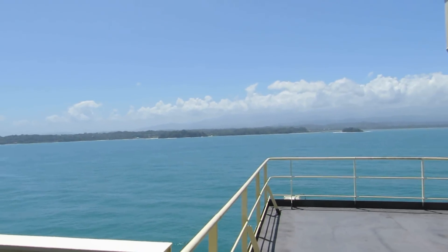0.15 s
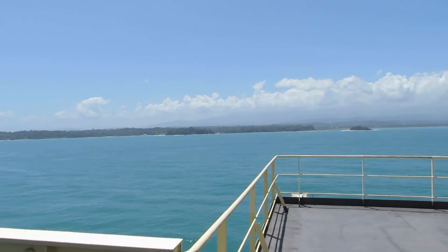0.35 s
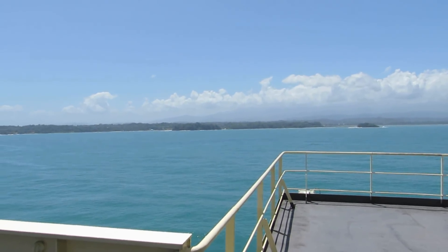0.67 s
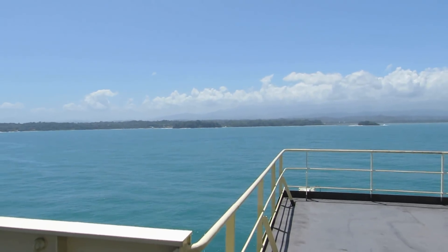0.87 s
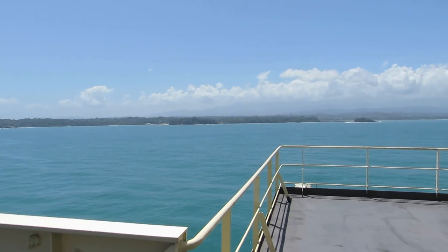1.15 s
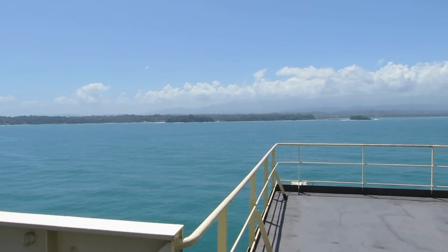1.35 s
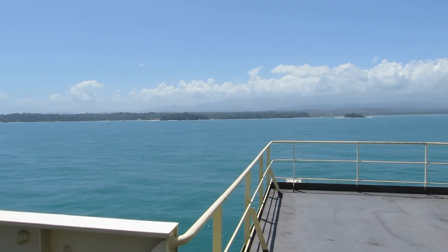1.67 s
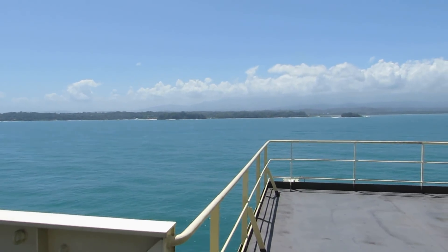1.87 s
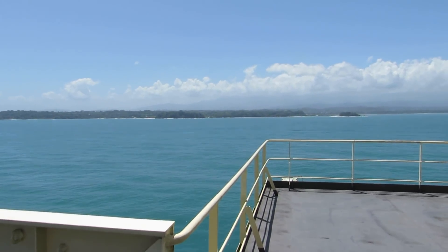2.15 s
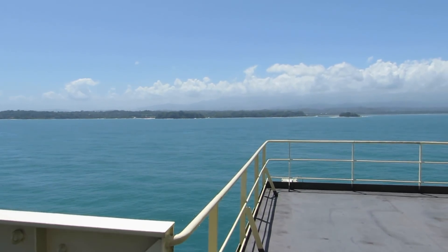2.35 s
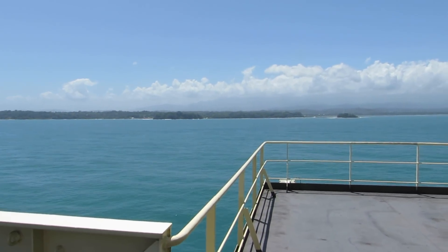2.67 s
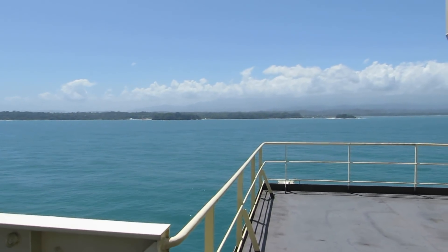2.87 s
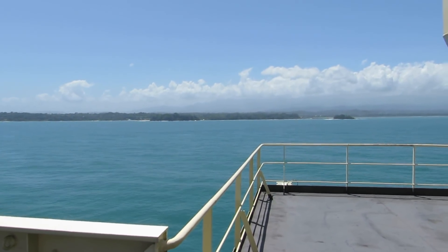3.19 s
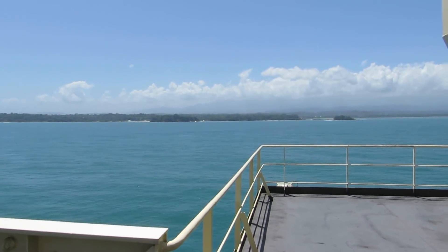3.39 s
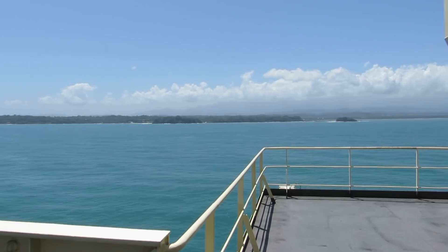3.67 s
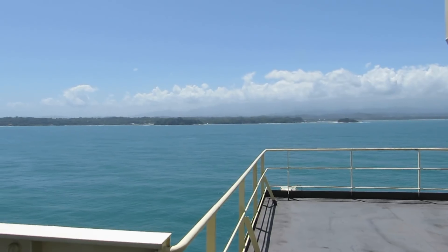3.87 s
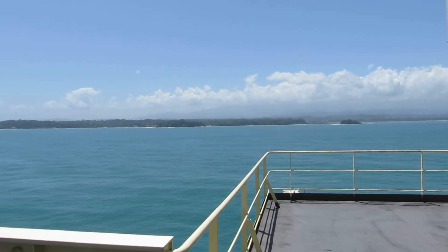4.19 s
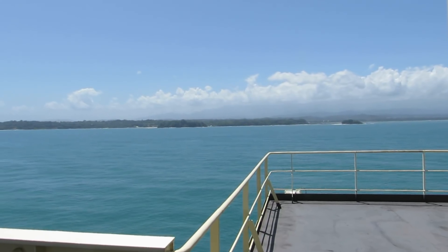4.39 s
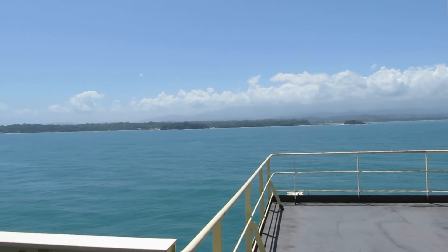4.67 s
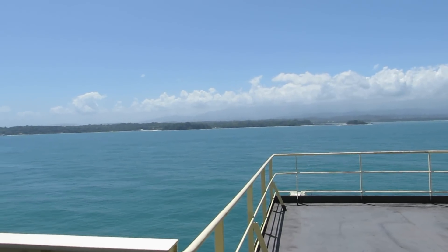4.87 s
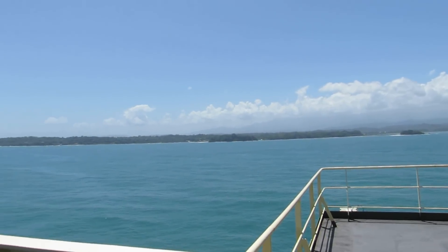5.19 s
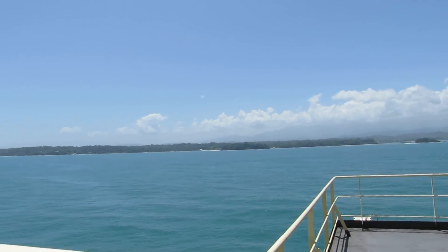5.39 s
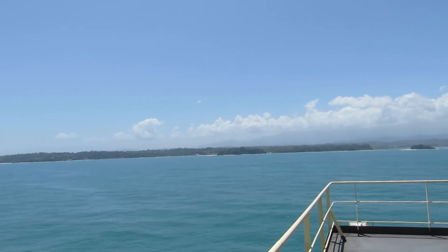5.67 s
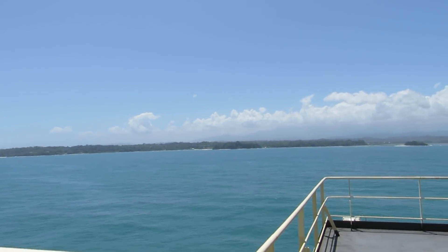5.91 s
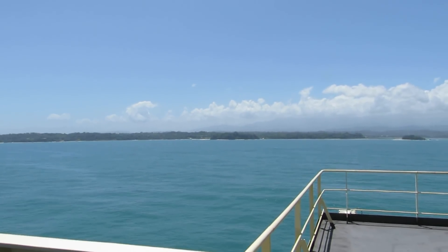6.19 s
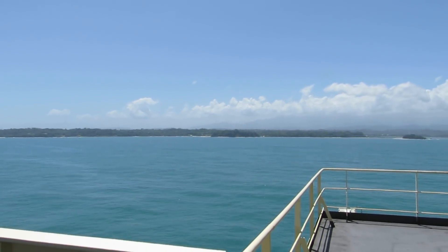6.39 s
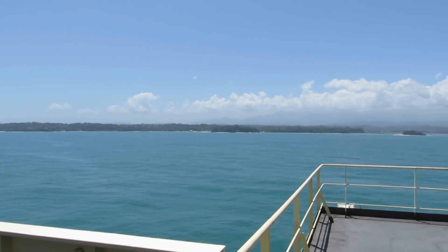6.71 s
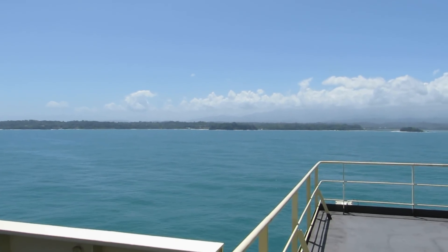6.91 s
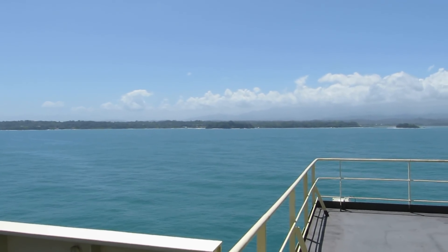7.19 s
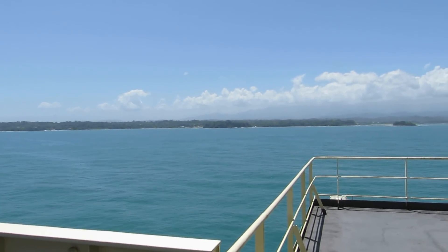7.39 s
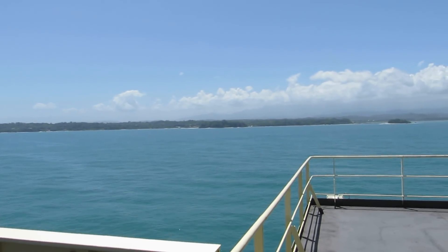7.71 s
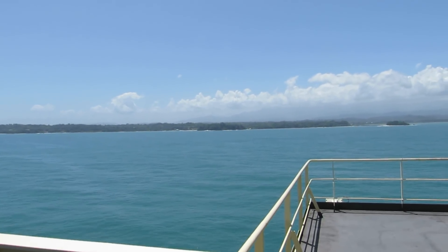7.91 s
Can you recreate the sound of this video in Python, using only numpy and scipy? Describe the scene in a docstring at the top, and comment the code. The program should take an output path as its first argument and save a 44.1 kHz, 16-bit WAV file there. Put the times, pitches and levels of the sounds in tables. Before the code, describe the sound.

A large ship's diesel engine runs for the whole eight seconds, heard from an open deck. It is a deep, steady drone with an even throb of about six beats a second, sitting slightly to the left. Blended with it are a low rush of exhaust, wavering machinery hums, a faint blower whine, the airy roar of ventilators and a soft wash of sea. A light breeze brushes the microphone, with a small puff near 1.2 seconds. From about 3.5 to 4.5 seconds, hard gusts buffet the microphone in quick, loud, low thumps, and the background dips slightly before recovering. Weaker puffs follow between 5.5 and 6 seconds. Small, close clicks come at about 4.6, 4.8 and 5.5 seconds, with fainter ticks earlier, around 1.2 and 2.4. The engine keeps the same speed to the end.

```python
"""A deep diesel throb on a ship's open deck: harmonics of a 720 rpm engine beat into a boom, a drone and
a bark while exhaust gas puffs from the funnel. Behind it machines hum, a blower whines, ventilators roar
through ringing ducts and the sea washes. Gusts buffet the camera's microphone ports, and the hardest
push its gain control down. Small ticks and faint rustles sound close by."""
import sys
import numpy as np
from scipy import signal
from scipy.fft import rfft, irfft
from scipy.io import wavfile
from scipy.ndimage import uniform_filter1d, minimum_filter1d

SR = 44100
rng = np.random.default_rng(int(sys.argv[2]) if len(sys.argv) > 2 else 0)


def inscribe(sig):
    """Save sig as 16-bit PCM at rate SR to the path in sys.argv[1].

    A 1-D sig is mono; a 2-D sig holds one channel per row.
    Samples are clipped to [-1, 1] before scaling.
    """
    pcm = np.round(np.clip(np.atleast_2d(sig).T, -1, 1) * 32767)
    wavfile.write(sys.argv[1], SR, pcm.astype(np.int16))


N = 355005
TIME = np.arange(N) / SR
FREQS = np.maximum(np.fft.rfftfreq(N, 1 / SR), 1)


def from_db(db):
    """Decibels to gain."""
    return 10 ** (np.asarray(db) / 20)


def unit_rms(x):
    """Scale to unit power."""
    return x / np.sqrt(np.mean(x ** 2) + 1e-20)


def eq_curve(points):
    """Draw (freq_hz, db) points across the spectrum, on a log-frequency axis."""
    hz, db = np.transpose(points)
    return np.interp(np.log(FREQS), np.log(hz), db)


def fader(points):
    """Ride a level through (time_s, db) points in straight lines."""
    return np.interp(TIME, *np.transpose(points))


def drift(rate_hz):
    """A smooth random wander with a spread of 1, mostly slower than rate_hz."""
    hop, settle = 100, 2000
    pole = np.exp(-2 * np.pi * rate_hz * hop / SR)
    steps = rng.standard_normal(N // hop + settle + 2)
    slow = signal.lfilter([1], [1, -2 * pole, pole * pole], steps)[settle:]
    return np.interp(np.arange(N) / hop, np.arange(len(slow)), unit_rms(slow))


def noise(density_db):
    """Noise with the given level per Hz."""
    return irfft(rfft(rng.standard_normal(N)) * from_db(density_db) * np.sqrt(SR / 2), N)


def tone(clock, hz, level_db, waver_hz):
    """A sine whose pitch wavers on its way through the moving air."""
    turns = hz * clock + np.cumsum(waver_hz * drift(3.0)) / SR + rng.random()
    return np.sqrt(2) * from_db(level_db) * np.sin(2 * np.pi * turns)


def wide(x):
    """Spread a signal by giving the two channels opposite polarity."""
    return np.array([x, -x])


# Pan of the machinery: freq_hz, left_over_right_db
PAN = [(30, 3.5), (100, 6.5), (300, 6), (550, 2.5), (900, 2), (3000, 1)]

def from_left(x):
    """Place a source to the left, most clearly in the bass."""
    tilt = from_db(eq_curve(PAN))
    gains = 2 * np.array([tilt, np.ones_like(tilt)]) / (1 + tilt)
    return irfft(rfft(x) * gains, N)


# Duct resonances: pitch_hz, width_hz, boost_db
DUCT_PEAKS = [(388, 22, 5.5), (493.4, 42, 8), (575, 15, 4), (713, 65, 4), (915, 42, 3.5), (1020, 120, 3.5),
              (1660, 35, 4), (2550, 66, 1)]

def duct_boost():
    """The ducts ring at a few pitches: their boost in dB across the spectrum."""
    return sum(db / (1 + (2 * (FREQS - hz) / width_hz) ** 2) for hz, width_hz, db in DUCT_PEAKS)


# Tone colour of the surrounding bed: freq_hz, density_db
WASH_EQ = [(12, -73.5), (30, -56), (90, -48.5), (170, -62), (250, -69), (340, -68.5), (450, -74),
           (750, -79), (1400, -84), (3000, -93.5), (4600, -100), (9000, -107.5), (12000, -117),
           (15000, -136)]

def sea_wash(duct_share=.6):
    """Sea wash and the ducts' reflections make a steady bed of noise."""
    return noise(eq_curve(WASH_EQ) + duct_share * duct_boost())


# Tone colour of the ventilators, before the ducts: freq_hz, density_db
VENT_EQ = [(100, -78.5), (340, -64.5), (440, -66.5), (560, -65), (800, -68.5), (1050, -70.5), (1400, -74),
           (2200, -82), (3000, -85.5), (4600, -96.5), (6500, -101), (9000, -108), (12000, -120.5),
           (15000, -140)]
# Level ride on their roar: time_s, gain_db
VENT_RIDE = [(0, -0.1), (.6, -1.6), (1.9, -1.74), (2.9, -.8), (5.4, -1.43), (6.5, -1.4), (7.2, -1.8),
             (8.05, -.3)]

def ventilators():
    """Air roars evenly through the ringing ducts."""
    return noise(eq_curve(VENT_EQ) + duct_boost()) * from_db(fader(VENT_RIDE))


# Faint hums and whines of pumps, fans and auxiliaries: pitch_hz, level_db, waver_hz
FAINT_HUMS = [(115.8, -41, .3), (118, -43, .3), (145.5, -39, .5), (165, -42, .7), (278, -49, .3),
              (844, -63, .6), (1191.3, -61.5, 1.0), (1631, -64, 2.5)]

def machinery_hums(clock, flutter_db=3.0):
    """Faint hums and whines, including the blower's fourth harmonic, swell and fade in the moving air."""
    return sum(tone(clock, hz, db + flutter_db * drift(.65), waver_hz)
               for hz, db, waver_hz in FAINT_HUMS)


# Level ride on the generator: time_s, level_db
GENERATOR_RIDE = [(0, -33.5), (.8, -35), (2.2, -31.5), (3.3, -37), (4.3, -33), (5.2, -31.5), (6.4, -31),
                  (7, -34)]

def generator(clock, pitch_hz=236.2, flutter_db=.1):
    """One strong hum, as of a generator, slowly rises and falls in level."""
    return tone(clock, pitch_hz, fader(GENERATOR_RIDE) + flutter_db * drift(1.5), waver_hz=.08)


# Level rides on the blower's first three harmonics: time_s, blade_db, octave_db, twelfth_db
BLOWER_RIDE = [(0, -33, -57, -48), (.9, -37, -54, -56), (2.3, -37, -49, -53), (3.3, -43, -49, -54),
               (4.4, -39, -63, -57), (5.2, -35, -66, -52), (6.4, -39, -56, -51), (7, -35.5, -51, -52.5),
               (7.8, -33, -49, -53)]

def blower(clock, blade_hz=297.7, hum_flutter_db=1.0, whine_flutter_db=3.0, reflection_db=-5):
    """A blower hums at its blade rate and whines above it; a reflection spreads the hum wide."""
    times, *rides = np.transpose(BLOWER_RIDE)
    hum_db, *overtones_db = [np.interp(TIME, times, ride) for ride in rides]
    hum = tone(clock, blade_hz, hum_db + hum_flutter_db * drift(1.5), waver_hz=.075)
    whine = sum(tone(clock, harmonic * blade_hz, db + whine_flutter_db * drift(2.1), waver_hz=1.2)
                for harmonic, db in enumerate(overtones_db, 2))
    reflection = wide(signal.hilbert(hum).imag)  # a quarter turn out of step with the hum
    return from_left(hum + whine) + from_db(reflection_db) * reflection


# Faint high rustles: middle_s, length_s, peak_db
RUSTLE_CUES = [(1.165, .07, -72), (4.802, .26, -67)]

def rustle(band_hz=(8000, 12000)):
    """Soft brushes of hiss swell and fade, as of a hand shifting on the camera."""
    band = signal.butter(2, band_hz, "band", fs=SR, output="sos")
    swell = sum(from_db(db) * np.cos(np.pi * np.clip((TIME - middle_s) / length_s, -.5, .5))
                for middle_s, length_s, db in RUSTLE_CUES)
    return swell * unit_rms(signal.sosfilt(band, rng.standard_normal((2, N))))


def contact(hz, octaves, decay_s, attack_db=3, spread=.5):
    """A sharp contact and its dying chatter in one band, a little different at each microphone port."""
    age = TIME[:SR // 10]
    energy_samples = decay_s * SR / 2
    drive = rng.standard_normal((2, len(age))) * np.exp(-age / decay_s) / np.sqrt(energy_samples)
    drive[0, 0] += from_db(attack_db)  # the first touch stands out from the chatter
    edges_hz = np.minimum(hz * 2 ** (np.array([-octaves, octaves]) / 2), [.4 * SR, .45 * SR])
    bursts = signal.sosfilt(signal.butter(4, edges_hz, "band", fs=SR, output="sos"), drive)
    mid, side = bursts / np.sqrt(np.sum(bursts ** 2, axis=1, keepdims=True) / energy_samples)
    return mid + spread * wide(side)


def crackle_cues(floor_db=-67, range_db=8, centre_hz=8000):
    """Cues for tiny random ticks, which crowd together while the hand shifts on the camera."""
    throughout, handling = (0, TIME[-1], 3), (3.9, 5.6, 12)
    cues = []
    for start_s, end_s, per_s in (throughout, handling):
        for when, size, pitch in rng.random((int(per_s * (end_s - start_s)), 3)):
            level_db = floor_db + range_db * size ** 2
            hz = centre_hz * 2 ** (pitch - .5)
            cues.append((start_s + when * (end_s - start_s), level_db, hz, level_db, hz, 0))
    return cues


# Close ticks and taps: start_s, ring_db, ring_hz, snap_db, snap_hz, left_over_right_db
TICK_CUES = [(.4289, -56, 5500, -56, 9000, 0), (1.1533, -47.5, 4800, -55, 7000, 0),
             (2.4195, -41, 3200, -47.5, 4800, 0), (4.2946, -62, 9000, -56, 6500, 0),
             (4.579, -57, 11000, -52, 5500, 1), (4.585, -51, 11500, -43, 4200, 1),
             (4.5902, -30, 1350, -31, 3400, 1), (4.591, -31, 1800, -42, 8500, 1),
             (4.597, -52, 11000, -45, 4500, 1), (4.809, -47, 8300, -40, 3500, 4.5),
             (4.8255, -40, 8300, -39.5, 3600, 4.5), (4.8285, -37.5, 9000, -39.5, 4600, 4.5),
             (5.1243, -52, 4600, -54, 5500, 1.5), (5.4565, -37, 1250, -27, 2200, .5),
             (5.458, -35.5, 2450, -53, 6000, -1), (7.1245, -59, 11500, -53, 6500, 2.5),
             (7.275, -59, 9500, -62, 9000, 0)]

def ticks(ring_cycles=8.1):
    """Each tick is a brief broad snap and a ring of a few cycles, so bright ones die sooner."""
    track = np.zeros((2, N + SR))
    for start_s, ring_db, ring_hz, snap_db, snap_hz, left_db in TICK_CUES + crackle_cues():
        ring = from_db(ring_db) * contact(ring_hz, octaves=.57, decay_s=ring_cycles / ring_hz)
        snap = from_db(snap_db) * contact(snap_hz, octaves=1.25, decay_s=.0013)
        pan = from_db([[left_db / 2], [-left_db / 2]])
        start = int(start_s * SR)
        track[:, start:start + ring.shape[1]] += (ring + snap) * pan
    return track[:, :N]


# Gusts on the microphone: start_s, length_s, level_db
GUST_CUES = [(1.165, 0.035, -19), (1.622, 0.29, -29.5), (2.037, 0.068, -27), (3.195, 1.44, -27.5),
             (3.542, 0.06, -14), (3.606, .042, -6.5), (3.751, 0.059, -5.8), (3.812, 0.082, -7.2),
             (3.953, .06, -9), (4.137, 0.11, -7.5), (4.231, 0.104, -9.5), (4.442, 0.07, -13),
             (4.977, 0.31, -35), (5.516, 0.26, -23), (5.893, 0.24, -27.5)]

def airflow(edge_s=.016, breeze_db=-40, swing_db=3):
    """The wind's envelope: gusts rise, hold and fall over a restless light breeze."""
    gusts = sum(from_db(db) * ((TIME > start_s) & (TIME < start_s + length_s))
                for start_s, length_s, db in GUST_CUES)
    breeze = from_db(breeze_db + swing_db * drift(2.6))
    return uniform_filter1d(gusts, int(edge_s * SR) + 1) + breeze


# Tone colour of the turbulence: freq_hz, relative_db
BUFFET_EQ = [(15, -20), (34, 4.5), (80, 0), (130, 5), (180, -0.5), (280, -5), (400, -12), (600, -29),
             (850, -48), (2000, -83)]

def wind(strength, lumpy_db=2.5, dull_hz=170, fully_bright_db=-9):
    """Eddies buffet the microphone ports; hard gusts are brighter."""
    rough = noise(eq_curve(BUFFET_EQ))
    dull = signal.lfilter(*signal.butter(1, dull_hz, fs=SR), rough)
    brightness = np.clip(strength / from_db(fully_bright_db), 0, 1)
    eddies = (dull + (rough - dull) * brightness) * from_db(lumpy_db * drift(36))
    running_rms = np.sqrt(uniform_filter1d(eddies ** 2, size=2200))
    return strength * eddies / running_rms


CYCLE_HZ = 6.0  # one four-stroke cycle is two revolutions
KNOCK_AT_S, DRONE_AT_S, BARK_AT_S = .026, .005, .1015  # where each lands in the cycle

# Tone colour of the rushing exhaust gas: freq_hz, density_db
FUNNEL_EQ = [(12, -79), (22, -65), (32, -61), (60, -52.5), (100, -49), (130, -54), (172, -45.5), (230, -51),
             (275, -60.5), (320, -56.5), (420, -63), (700, -85.5), (2000, -115)]

def funnel(clock, puff_depth=.19, throb_depth=.04):
    """Gas leaves in puffs, eight firings a cycle, swelling once a revolution."""
    phase = 2 * np.pi * CYCLE_HZ * (clock - DRONE_AT_S)
    pulsing = 1 + puff_depth * np.cos(8 * phase) + throb_depth * np.cos(2 * phase)
    return noise(eq_curve(FUNNEL_EQ)) * pulsing


# Exhaust harmonics: cycle_multiple, level_db
EXHAUST_HARMONICS = [(3, -41), (4, -35), (5, -39), (6, -41), (7, -26.7), (8, -26.2), (9, -33), (10, -39),
                     (12, -42), (13, -36), (15, -21.1), (17, -26), (18, -32.5), (19, -42), (20, -40),
                     (22, -43), (23, -37.5), (24, -43), (27, -44), (28, -46), (29, -38), (30, -45),
                     (32, -41), (37, -46), (40, -45.5), (43, -46), (44, -46.5)]

def diesel(clock, unsteady_db=.15, bark_flutter_db=1.0, bark_scatter_turns=.12, limp_depth=.13):
    """Harmonics of the engine cycle, held steady by a governor, beat together into a throb."""
    pipe_hz, pipe_half_width_hz, pipe_lag_turns = 48.2, 1.7, 1.5
    knock_turns, drone_turns, bark_turns = [CYCLE_HZ * (clock - at_s)
                                            for at_s in (KNOCK_AT_S, DRONE_AT_S, BARK_AT_S)]
    boom, drone, bark = np.zeros((3, N))
    for multiple, level_db in EXHAUST_HARMONICS:
        amplitude = np.sqrt(2) * from_db(level_db + unsteady_db * drift(2.0))
        if multiple < 13:
            # lows: the funnel pipe's resonance delays them, so a light knock leads one round boom
            detuning = (multiple * CYCLE_HZ - pipe_hz) / pipe_half_width_hz
            lag_turns = pipe_lag_turns * np.arctan(detuning) / np.pi
            boom += amplitude * np.sin(2 * np.pi * (multiple * knock_turns - lag_turns))
        elif multiple < 19:
            # above the boom, a drone swells once a revolution
            drone += amplitude * np.sin(2 * np.pi * multiple * drone_turns)
        else:
            # on top, one cylinder barks louder than the rest; reflections scatter its harmonics
            flutter = from_db(bark_flutter_db * drift(2.2))
            scatter_turns = bark_scatter_turns * rng.uniform(-1, 1)
            bark -= amplitude * flutter * np.cos(2 * np.pi * (multiple * bark_turns + scatter_turns))
    limp = 1 - limp_depth * np.cos(2 * np.pi * drone_turns)  # one revolution of the two is stronger
    return boom + drone * limp + bark


def scene(centre_wind_db=-15):
    """The mix: machinery to the left, sea and wind wide, a little wind in the centre, ticks up close."""
    clock = TIME + .0005 * drift(.15)  # engine and hums share one slightly wandering speed
    ship = diesel(clock) + funnel(clock) + machinery_hums(clock) + generator(clock) + ventilators()
    sea = sea_wash()
    air = airflow()
    machinery = from_left(ship) + blower(clock)
    buffeting = wide(wind(air)) + from_db(centre_wind_db) * wind(air)
    return wide(sea) + machinery + buffeting + ticks() + rustle()


def gain_control(x, threshold_db=-9.5, release_db_per_s=5.5, window_s=.047, attack_s=.02):
    """Loud moments push the gain down quickly; it creeps back."""
    power = uniform_filter1d(np.mean(x ** 2, axis=0), int(window_s * SR) + 1)
    over_db = np.maximum(10 * np.log10(power + 1e-12) - threshold_db, 0)
    release_db = release_db_per_s * TIME
    held_db = np.maximum.accumulate(over_db + release_db) - release_db
    pole = np.exp(-1 / (attack_s * SR))
    return x * from_db(-signal.lfilter([1 - pole], [1, -pole], held_db))


def limiter(x, ceiling=.96, window_samples=601):
    """The gain ducks smoothly under any peak that would overload."""
    allowed = np.minimum(ceiling / (np.abs(x).max(axis=0) + 1e-9), 1)
    return x * uniform_filter1d(minimum_filter1d(allowed, window_samples), window_samples)


# Narrow dips in the microphone's response: centre_hz, width_hz
MIC_NOTCHES = [(3930, 340), (7820, 230)]

def record(dry, top_cut_hz=15600):
    """The microphone chain: gain control, limiter, click-free ends, two notches and a steep top cut."""
    out = limiter(gain_control(dry)) * signal.windows.tukey(N, .001)
    for hz, width_hz in MIC_NOTCHES:
        out = signal.lfilter(*signal.iirnotch(hz, hz / width_hz, fs=SR), out)
    return signal.sosfilt(signal.cheby2(14, 70, top_cut_hz, fs=SR, output="sos"), out)


dry = scene()
out = record(dry)
inscribe(out)
```